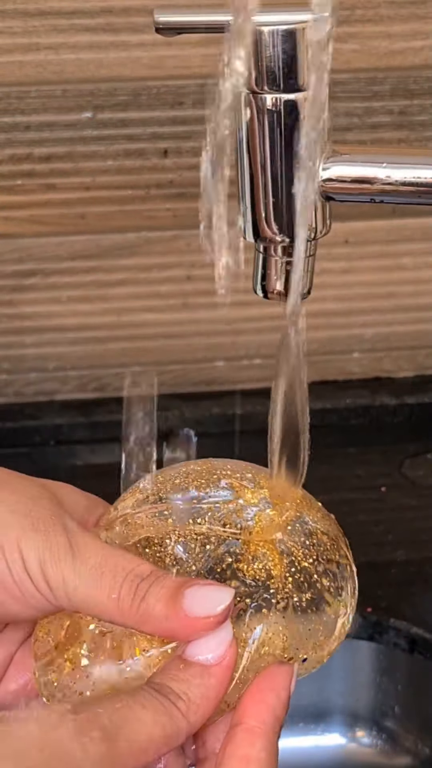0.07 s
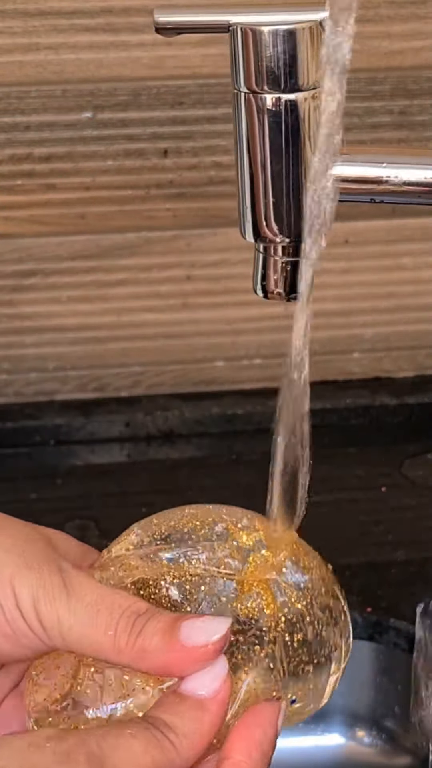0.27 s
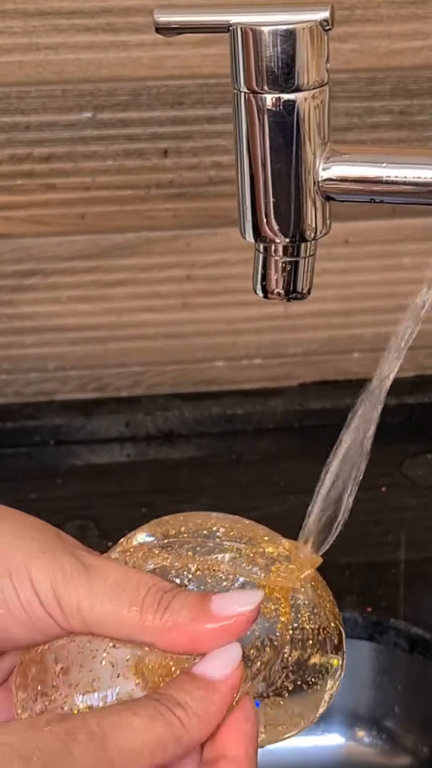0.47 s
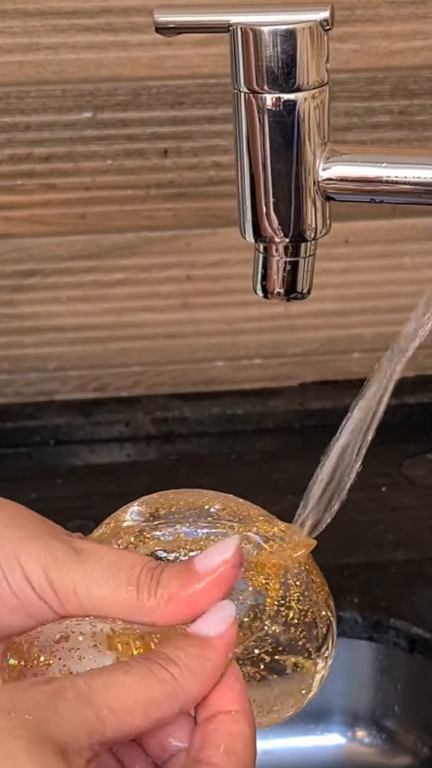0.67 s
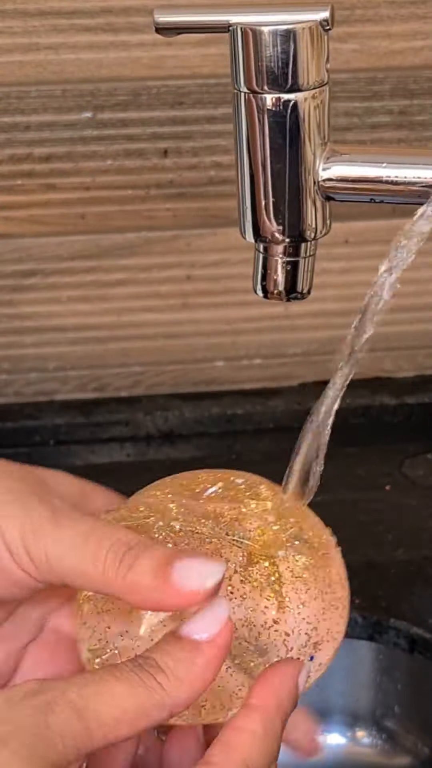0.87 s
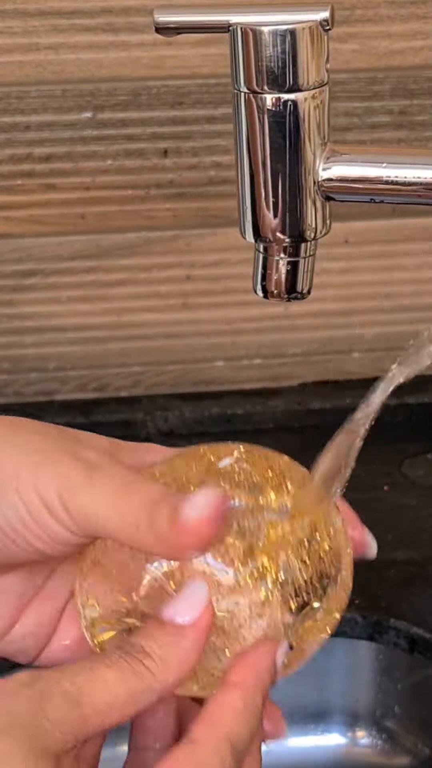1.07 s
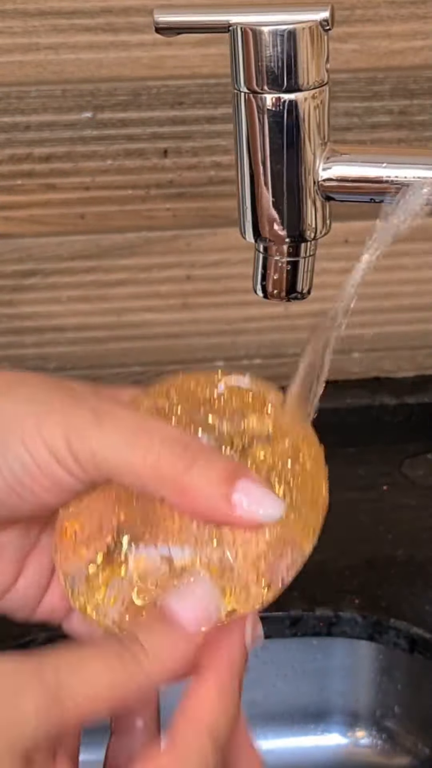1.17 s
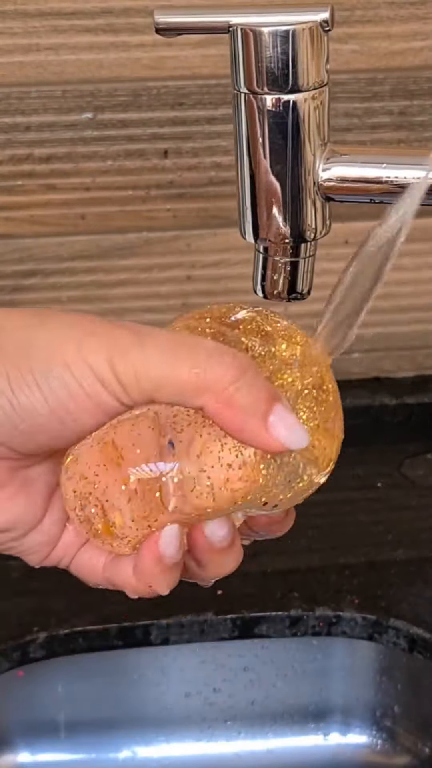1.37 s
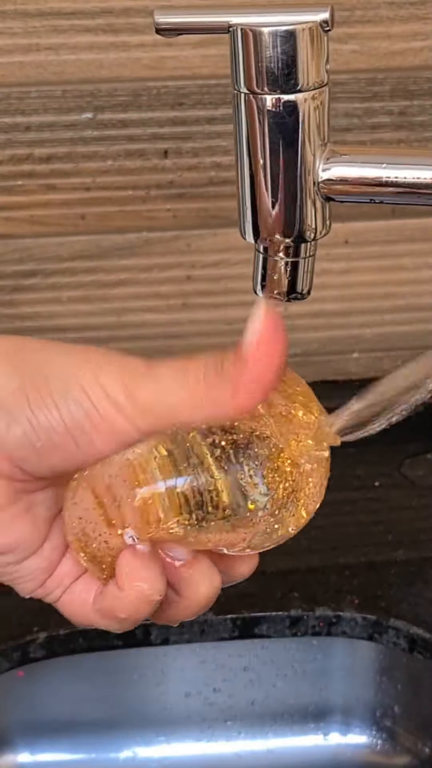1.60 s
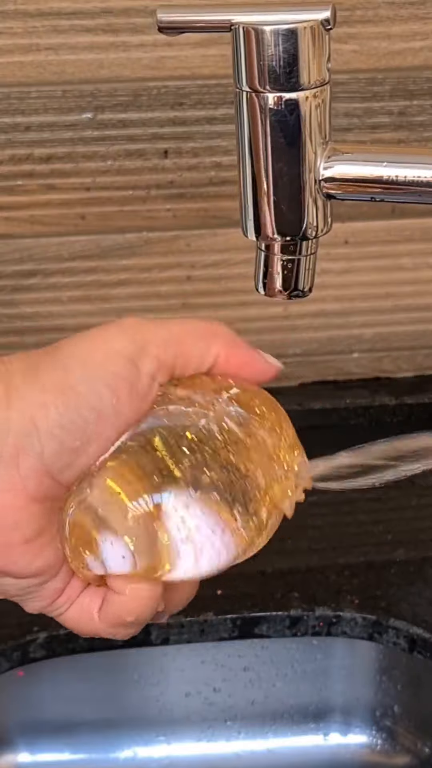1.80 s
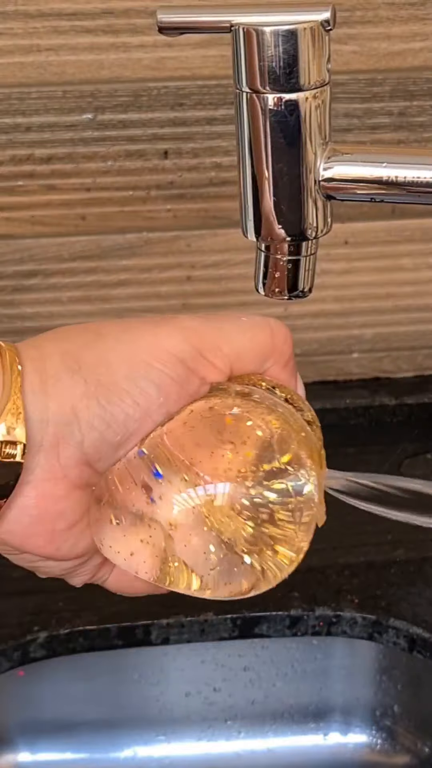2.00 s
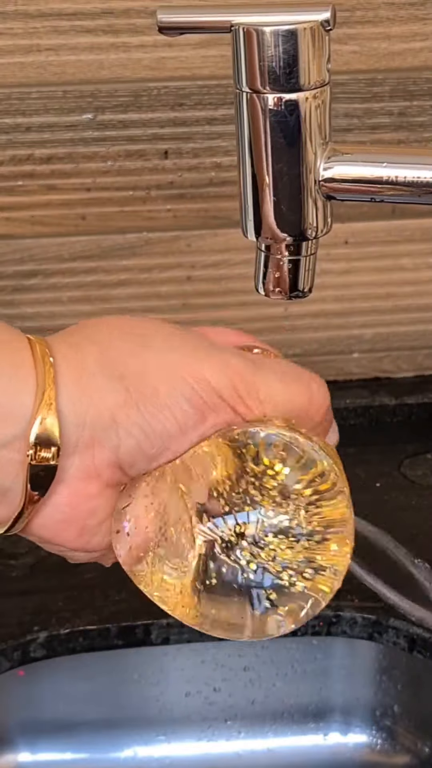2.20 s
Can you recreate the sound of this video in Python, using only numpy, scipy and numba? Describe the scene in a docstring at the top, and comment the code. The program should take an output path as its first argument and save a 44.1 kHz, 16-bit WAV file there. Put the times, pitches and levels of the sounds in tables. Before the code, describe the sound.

Water squirted from a squishy ball splashes into a steel sink with hollow drumming, then thins to light spray and drips. Wet rubber squelches and fizzes faintly under the fingers, close to the microphone in a small kitchen.

```python
"""Squishy ball over a steel sink

A water-filled ball is squeezed close to the microphone in a small kitchen. The jet falls back in slugs
whose impacts drive the modes of the basin and throw spray. Wet rubber squelches under the fingers,
air and water fizz at the hole, an air pocket plops once, and single droplets tick nearby.
Short echoes, a faint hum and the rumble of the hands surround them."""
import sys
import numpy as np
from scipy import signal
from scipy.fft import rfft, irfft, next_fast_len
from scipy.io import wavfile
from scipy.ndimage import uniform_filter1d
from numba import njit

SR = 44100
rng = np.random.default_rng(int(sys.argv[2]) if len(sys.argv) > 2 else 0)


def materialize(psi):
    """Save the field psi as 16-bit PCM at rate SR to the path in sys.argv[1].

    A 1-D psi becomes a single channel; in a 2-D psi each row is a channel.
    """
    bounded = np.clip(np.atleast_2d(psi).T, -1, 1)
    quanta = np.round(bounded * 32767).astype(np.int16)
    wavfile.write(sys.argv[1], SR, quanta)


N = 99225
T = np.arange(N) / SR

# Water landing in the sink. Each row: start in seconds, length in seconds, then the relative
# levels in dB of floor boom, wall tone, sheet ring, slap and spray.
LANDINGS = [(0.0, 0.0076, -27, -30.5, -31, -42, -49.5), (0.038, 0.017, -35, -39.5, -42.5, -44.5, -63),
            (0.111, 0.14, -59, -34, -44.5, -47, -61), (0.16, 0.028, -30, -49, -53, -61, -75),
            (0.224, 0.029, -17, -26, -28.5, -41, -44), (0.247, 0.0097, -10, -21, -20.5, -31, -46),
            (0.262, 0.047, -10, -55, -31, -42.5, -47.5), (0.332, 0.032, -32, -46, -33, -43.5, -54.5),
            (0.363, 0.026, -18, -57, -27.5, -37, -43), (0.391, 0.086, -17, -54, -35.5, -41, -49.5),
            (0.483, 0.041, -34, -30.5, -27.5, -32, -51), (0.542, 0.042, -43, -36.5, -45, -65, -45.5),
            (0.627, 0.068, -32.5, -44.5, -44, -68, -82), (0.726, 0.027, -35.5, -46.5, -47.5, -62, -80),
            (0.805, 0.07, -40.5, -53.5, -49.5, -72, -80), (0.97, 0.021, -46, -49, -42.5, -53, -46),
            (1.046, 0.015, -27, -49, -44, -39.5, -55), (1.117, 0.131, -38, -48.5, -45, -55.5, -70),
            (1.322, 0.17, -54, -57, -56.5, -48, -56.5), (1.576, 0.057, -56, -68, -58, -71, -50),
            (1.746, 0.011, -29.5, -50, -43, -65, -70), (1.787, 0.02, -33, -68, -56, -70, -49.5),
            (1.82, 0.25, -51, -88, -61, -69, -53), (2.043, 0.072, -47.5, -68, -62, -55, -46),
            (2.139, 0.028, -39.5, -52.5, -44.5, -53, -38.5), (2.197, 0.068, -56, -54.5, -48.5, -46.5, -39)]
# Modes of the steel basin. Each row: frequency in Hz, bandwidth in Hz, relative level in dB.
BASIN_MODES = [(125, 20, 7), (152, 36, 0), (200, 40, 1.5), (240, 34, -0.5), (308, 42, 2), (357, 24, 1),
               (392, 34, 0), (451, 22, 6), (488, 46, -3), (630, 50, -12), (760, 60, -12), (965, 44, -14),
               (1050, 50, -15), (1378, 44, -16)]
# Spectrum of water slapping steel. Each row: frequency in Hz, relative level in dB.
SLAP_SPECTRUM = [(130, 3), (300, -1), (700, 1.5), (880, -11), (1050, -2), (1450, -6), (1900, -5.5),
                 (2300, -11.5), (5000, -17.5), (16000, -44)]
# Spectrum of the spray. Each row: frequency in Hz, relative level in dB.
SPRAY_SPECTRUM = [(300, -42), (1500, -17), (3000, -2), (6000, -2), (9000, 5), (12500, 5.5), (15500, 2.5)]
# Wet rubber slipping under the fingers. Each row: start in seconds, length in seconds,
# centre in Hz, level in dB, left over right in dB.
RUBBER_SLIPS = [(0.023, 0.0076, 4560, -47, 2), (0.14, 0.0027, 5130, -40, 1),
                (0.1684, 0.0044, 7600, -39, 2.5), (0.242, 0.029, 5530, -40, 1),
                (0.302, 0.01, 4840, -44.5, -1), (0.387, 0.017, 4000, -40, 1), (0.415, 0.01, 4840, -38.5, 0),
                (0.62, 0.0061, 4560, -34, 1), (0.949, 0.0071, 6100, -46, 1), (0.978, 0.0062, 5760, -52, 3),
                (1.103, 0.0086, 4100, -47.5, 4), (1.138, 0.01, 3800, -43, 0.5),
                (1.308, 0.0064, 5000, -44.5, 4.5), (1.347, .014, 4000, -52, 0),
                (1.447, 0.0081, 4700, -33.5, 4), (1.4763, 0.0027, 4850, -27.5, 7),
                (1.4826, 0.0036, 5160, -23.5, -3.5), (1.487, 0.0055, 5300, -29.5, 2),
                (1.613, 0.003, 5040, -40, 7.5), (1.804, 0.036, 4170, -47, 0),
                (1.994, 0.011, 4500, -47.5, 0), (2.141, 0.0062, 7400, -41, 3), (2.22, 0.012, 4150, -42, -2)]
# Air and water at the hole. Each row: start in seconds, length in seconds, first and last
# centre in Hz, level in dB, bandwidth over centre.
HOLE_FIZZES = [(0.205, 0.073, 4170, 3330, -45, 0.32), (0.592, 0.021, 2900, 3280, -43.5, 0.27),
               (0.637, 0.071, 3950, 3440, -51.5, 0.37), (0.876, 0.027, 4470, 5030, -48, 0.18),
               (0.898, 0.048, 4100, 3500, -45.5, 0.29), (0.922, 0.014, 3270, 3076, -39, 0.087),
               (1.438, 0.0078, 4600, 4400, -35.5, 0.24), (1.592, 0.018, 5040, 4320, -45.5, 0.17),
               (1.615, 0.039, 4300, 3360, -42, 0.21), (1.661, 0.056, 4300, 3470, -54, 0.23),
               (1.804, 0.0088, 2950, 2720, -39.5, 0.23), (1.912, 0.011, 5230, 4950, -55, .15)]
# Single droplets. Each row: start in seconds, centre in Hz, click peak in dB, crackle level in dB.
DROPLET_IMPACTS = [(.008, 8300, -42, -39), (0.142, 12000, -36, -41), (.4529, 9700, -39, -31),
                   (0.457, 9700, -34, -30), (0.5548, 7950, -26.5, -37), (0.6231, 5900, -27, -49),
                   (1.1006, 12000, -48, -44), (1.125, 8400, -48, -41), (1.143, 12000, -45, -40),
                   (1.3111, 12100, -33, -32.5), (1.35, 10100, -34, -40), (1.449, 10600, -22, -28),
                   (1.5804, 10640, -40, -36.5), (1.746, 6200, -30.5, -40), (1.912, 13100, -36, -39),
                   (1.9703, 12900, -45, -38), (2.038, 11400, -27, -34), (2.065, 13100, -29, -44),
                   (2.0745, 13200, -23, -39), (2.082, 10600, -24, -37), (2.1017, 11000, -11.5, -28),
                   (2.1444, 12100, -33, -36), (2.2197, 5900, -22.5, -40)]
# Rumble of the moving hands. Each row: time in seconds, level in dB.
HAND_RUMBLE = [(0, -42), (1.15, -53.5), (1.29, -37.5), (1.36, -43.5), (1.6, -37), (1.7, -41), (1.82, -41),
               (1.95, -44.5), (2.25, -39)]
# Spectrum of the room noise. Each row: frequency in Hz, relative level in dB.
AIR_SPECTRUM = [(25, -34), (60, -11), (105, 6.5), (170, -9.5), (300, -6), (430, -14.5), (600, -13.5),
                (900, -18), (2000, -26), (4500, -30.5), (7000, -40), (9000, -37), (14000, -41.5),
                (16000, -40)]
# Partials of the room's hum. Each row: frequency in Hz, mean level in dB.
HUM_PARTIALS = [(100, -54), (296, -54), (578, -61.5)]
# Stereo width. Each row: frequency in Hz, gain of the side signal in dB.
SIDE_GAIN = [(60, -5.5), (140, -22.5), (350, -8.5), (700, 0), (1400, 1), (3000, 0), (16000, 0.5)]
# Microphone response. Each row: frequency in Hz, gain in dB.
MIC_RESPONSE = [(1000, 0), (5000, 0), (6900, 3), (8000, -6), (10200, -7), (12500, -1), (16000, -1)]


def basin():
    """Forced vibration: slugs of water swing the floor and wall, and their drops ring the sheet's modes."""
    # The shifting water bends both pitches.
    boom = wavering_tone(hz=96.5, wobble=0.013, rate=34.87) * landing(rise=0.011, t60=0.16, column=2)
    boom *= amp(1.64 * walk(40.47))
    wall = wavering_tone(hz=359, wobble=0.022, rate=34.87) * landing(rise=0.011, t60=0.21, column=3)
    wall *= amp(3.3 * walk(90))
    force = patter(per_s=1400, scatter_db=1) * landing(rise=0.0021, t60=0.078, column=4)
    ring = sum(amp(db) * double_band(force, hz, width / hz) for hz, width, db in BASIN_MODES)
    power_gain = sum(amp(2 * db) * width for _, width, db in BASIN_MODES) * np.pi / 2 / SR
    ring /= np.sqrt(power_gain)
    return boom * pan(-1.1) + (wall + amp(4) * ring) * pan(-3)


def splash():
    """Impact noise: many small collisions add up to a dull slap and a bright, bubbly spray."""
    rise, t60 = 0.0025, 0.16  # seconds
    slap = unit(colour(patter(per_s=890, scatter_db=3), SLAP_SPECTRUM)) * landing(rise, t60, column=5)
    drops = unit(colour(patter(per_s=3300, scatter_db=5.5), SPRAY_SPECTRUM))
    spray = unit(drops + amp(-0.5) * froth(per_s=2600, scatter_db=5))
    spray *= landing(rise, t60, column=6) * amp(2 * walk(110))
    return amp(-4) * slap + spray


def froth(per_s, scatter_db):
    """Bubble resonance: each bursting bubble rings for a few cycles at a pitch set by its size."""
    pitches_hz = np.geomspace(1590, 14940, 16)
    bubbles = sum(band(patter(per_s / len(pitches_hz), scatter_db), hz, width=0.18) for hz in pitches_hz)
    return unit(colour(bubbles, SPRAY_SPECTRUM))


def squelches():
    """Film rupture: slipping wet rubber gives off bursts of tiny pops."""
    out, t = np.zeros((2, N)), T[:SR // 4]
    for start, length, hz, db, pan_db in RUBBER_SLIPS:
        pops = unit(double_band(patter(per_s=1700, scatter_db=0, size=len(t)), hz, width=1))
        add(out, start, pops * swell(t, length, rise=0.00027, t60=0.037) * amp(db) * pan(pan_db))
    return out


def fizzes():
    """Cavity resonance: pops at the hole excite an air pocket of gliding pitch, and its octave."""
    out, t = np.zeros((2, N)), T[:SR // 4]
    for start, length, first_hz, last_hz, db, width in HOLE_FIZZES:
        hz = np.interp(t, [0, length], [first_hz, last_hz])
        pops = patter(per_s=2700, scatter_db=0.5, size=len(t))
        pocket = unit(double_band(pops, hz, width))
        octave = amp(-20.5) * unit(double_band(pops, 2 * hz, width))
        add(out, start, (pocket + octave) * swell(t, length, rise=0.0056, t60=0.14) * amp(db))
    return out


def droplets():
    """Impact and reflection: a hard click, mirrored by the nearest surface, and a short bright crackle."""
    out, t = np.zeros((2, N)), T[:SR // 16]
    for start, hz, click_db, crackle_db in DROPLET_IMPACTS:
        tap = np.zeros((2, len(t)))
        tap[:, 0] = 1
        echo_s = (1 + rng.random(2)) * 0.00045
        tap[[0, 1], (echo_s * SR).astype(int)] += 0.5
        click = double_band(tap, hz, width=1)
        click /= np.abs(click).max()
        crackle = unit(band(patter(per_s=5500, scatter_db=0, size=len(t)), hz, width=0.73))
        crackle *= swell(t, length=3 / hz, rise=0.00077, t60=0.026)
        add(out, start, amp(click_db) * click + amp(crackle_db) * crackle)
    return out


def plop():
    """Damped oscillation: an air pocket opens with one hollow note and a dull knock of the rubber."""
    out, t = np.zeros((2, N)), T[:SR // 4]
    start_s, rise_s, note_hz = 1.746, 0.0018, 930
    note = np.sin(2 * np.pi * note_hz * t) * swell(t, rise_s, rise_s, t60=0.022)
    knock = unit(double_band(rng.standard_normal((1, len(t))), hz=695, width=1.3))
    knock *= swell(t, rise_s, rise_s, t60=0.047)
    add(out, start_s, amp(-31) * note + amp(-38.5) * knock)
    return out


def reflections(x, t60, db):
    """Reverberation: dense echoes decay exponentially, independently on each side."""
    t = T[:SR // 2]
    tail = rng.standard_normal((2, len(t))) * swell(t, length=0, rise=0.0027, t60=t60)
    tail /= np.sqrt(np.sum(tail ** 2, axis=1, keepdims=True))
    return amp(db) * signal.fftconvolve(x, tail, axes=1)[:, :N]


def background():
    """Ambient noise: room air, hum, faint stray bubbles and the rumble of the hands superpose."""
    air = unit(colour(rng.standard_normal((2, N)), AIR_SPECTRUM)) * amp(-41.5 + walk(9.2))
    hum = sum(amp(db + 2 * walk(7.83)) * wavering_tone(hz, wobble=0.01008, rate=10)
              for hz, db in HUM_PARTIALS)
    stray = froth(per_s=1400, scatter_db=-2) * amp(-66 + walk(11.5))
    rumble = unit(double_band(rng.standard_normal((1, N)), hz=52, width=0.55))
    rumble *= amp(np.interp(T, *np.array(HAND_RUMBLE).T))
    return air + hum + stray + rumble


def landing(rise, t60, column):
    """Incoherent addition: the envelopes of all landings sum in power, for one level column."""
    return np.sqrt(sum((amp(row[column]) * swell(T - row[0], row[1], rise, t60)) ** 2 for row in LANDINGS))


def swell(t, length, rise, t60):
    """Exponential decay after a linear rise and a hold until length; all times in seconds."""
    return np.clip(t / rise, 0, 1) * amp(-60 * np.maximum(t - length, 0) / t60)


def patter(per_s, scatter_db, size=N):
    """Shot noise: random impulses, each reaching the two microphone ports a little apart."""
    max_lag_s = 0.00025
    chance, bearing = rng.random((2, size))
    strength = rng.choice([-1, 1], size) * amp(scatter_db * np.clip(rng.standard_normal(size), -2, 2))
    hits = np.flatnonzero(chance < per_s / SR)
    lag = np.round((2 * bearing[hits] - 1) * max_lag_s * SR).astype(int)
    out = np.zeros((2, size))
    out[0, hits] = strength[hits]
    out[1, np.clip(hits + lag, 0, size - 1)] = strength[hits]
    return unit(out)


def wavering_tone(hz, wobble, rate):
    """Frequency modulation: a sine of rms 1 whose pitch wanders by the fraction wobble."""
    return np.sqrt(2) * np.sin(2 * np.pi * np.cumsum(hz * (1 + wobble * walk(rate))) / SR)


def walk(rate):
    """Low-pass noise of rms 1, smoothed from rate random steps a second."""
    hold = int(SR / rate)
    steps = np.repeat(rng.standard_normal(N // hold + 1), hold)
    return unit(uniform_filter1d(uniform_filter1d(steps, hold), hold)[:N])


@njit
def resonator(x, hz, width):
    """State-variable band-pass with a moving centre; width is bandwidth over centre."""
    y, band_state, low_state = np.empty(len(x)), 0., 0.
    for i in range(len(x)):
        g = np.tan(np.pi * min(hz[i], .44 * SR) / SR)
        passed = (band_state + g * (x[i] + 1e-18 - low_state)) / (1 + g * (g + width))
        band_state = 2 * passed - band_state
        low_state += 2 * g * passed
        y[i] = width * passed
    return y


def band(x, hz, width):
    """One resonance on every channel."""
    return np.array([resonator(channel, hz + np.zeros(len(channel)), float(width)) for channel in x])


def double_band(x, hz, width):
    """Two equal resonances in cascade, for steeper skirts."""
    return band(band(x, hz, width), hz, width)


def colour(x, points):
    """Spectral shaping by a curve through (Hz, dB) points."""
    hz, db = np.array(points, float).T
    size = next_fast_len(N + 4096)
    bins_hz = np.maximum(np.fft.rfftfreq(size, 1 / SR), 1)
    gain = amp(np.interp(np.log(bins_hz), np.log(hz), db))
    return irfft(rfft(x, size) * gain, size)[..., :N]


def amp(db):
    """Decibels to amplitude ratio."""
    return 10 ** (np.asarray(db) / 20)


def unit(x):
    """Normalisation to rms 1."""
    return x / np.sqrt(np.mean(x ** 2) + 1e-20)


def pan(db):
    """Channel gains that put the left db above the right."""
    return amp(np.array([[db], [-db]]) / 2)


def add(out, start, sound):
    """Superposition of a short sound, from start in seconds."""
    i = int(np.clip(start * SR, 0, N - 1))
    out[:, i:i + sound.shape[1]] += sound[:, :N - i]


def scene():
    """Direct and reflected sound: the basin booms to the right; the wet sounds echo in sink and kitchen."""
    steel = basin()
    wet = splash() + squelches() + fizzes() + droplets() + plop()
    wet += reflections(wet, t60=0.027, db=-5)  # sink
    wet += reflections(wet, t60=0.2, db=-10)  # kitchen
    left, right = wet + background()
    side = colour((left - right) / 2, SIDE_GAIN)  # bass nearly alike on both sides
    return steel + (left + right) / 2 + np.array([side, -side])


def record(dry):
    """Frequency response: the microphone has a dip in the upper treble, and the top is cut steeply."""
    cutoff_hz = 15900
    low_pass = signal.ellip(10, .2, 80, cutoff_hz, fs=SR, output="sos")
    return signal.sosfilt(low_pass, colour(dry, MIC_RESPONSE))


dry = scene()
out = record(dry)
materialize(out)
```